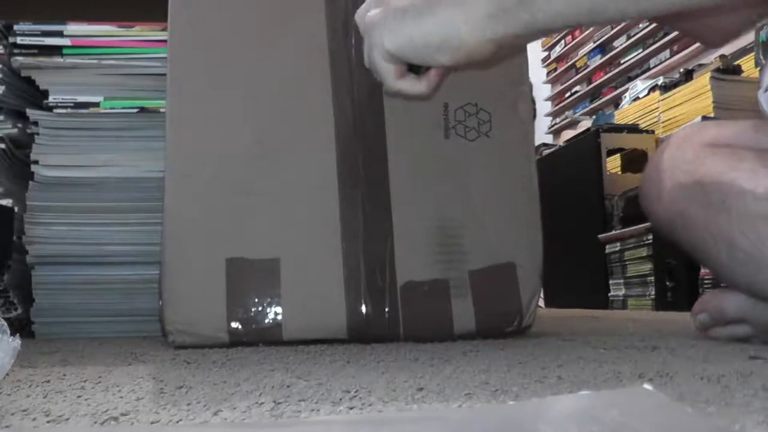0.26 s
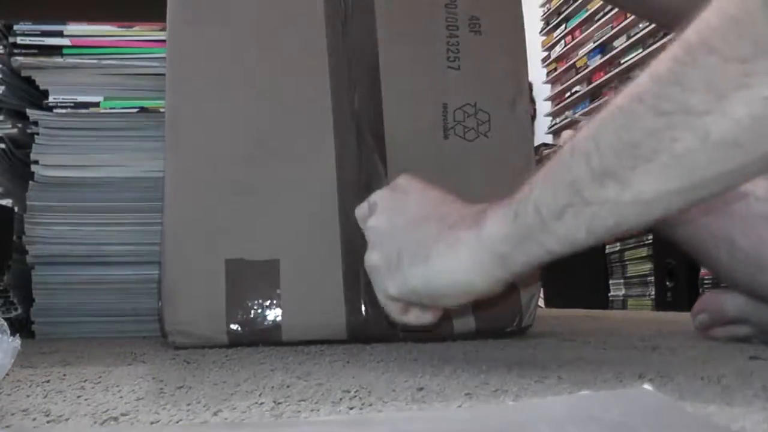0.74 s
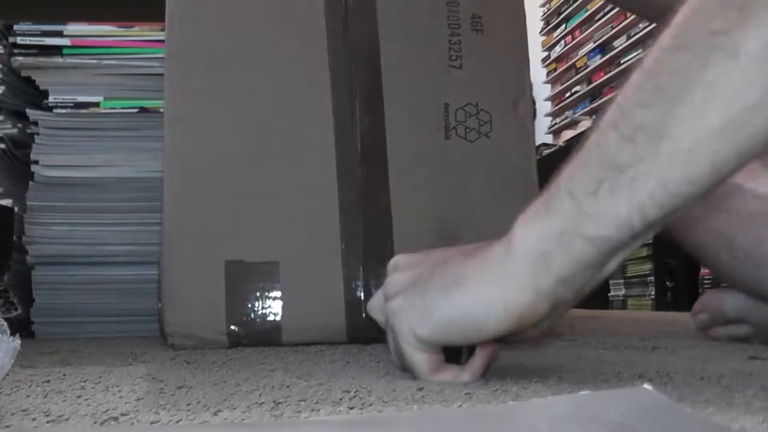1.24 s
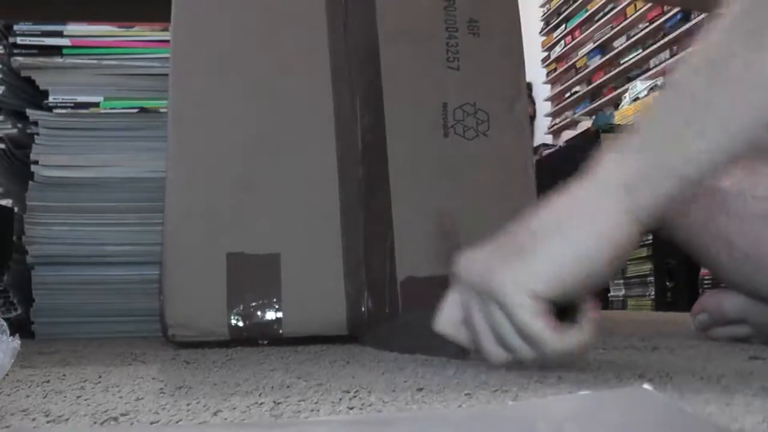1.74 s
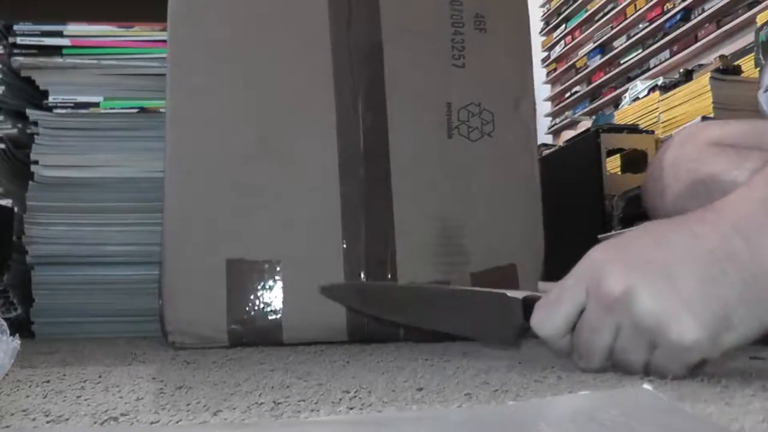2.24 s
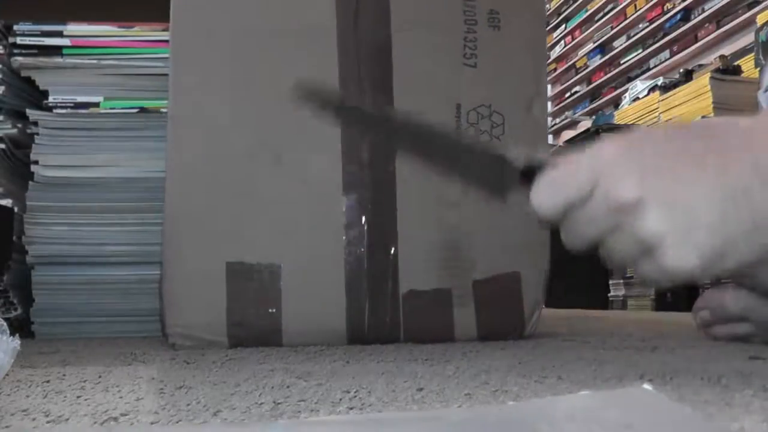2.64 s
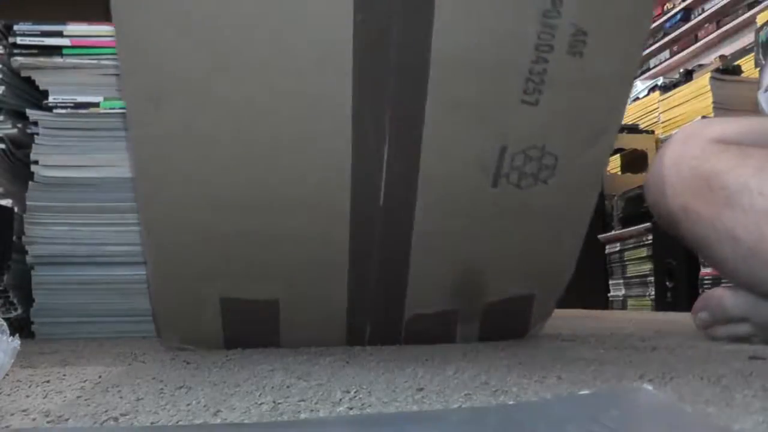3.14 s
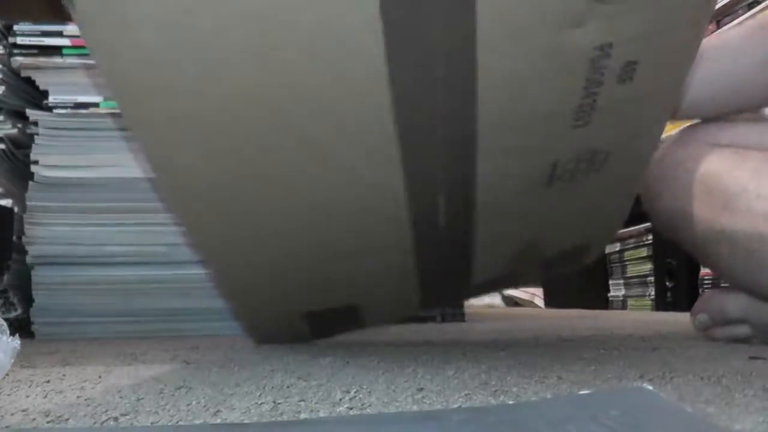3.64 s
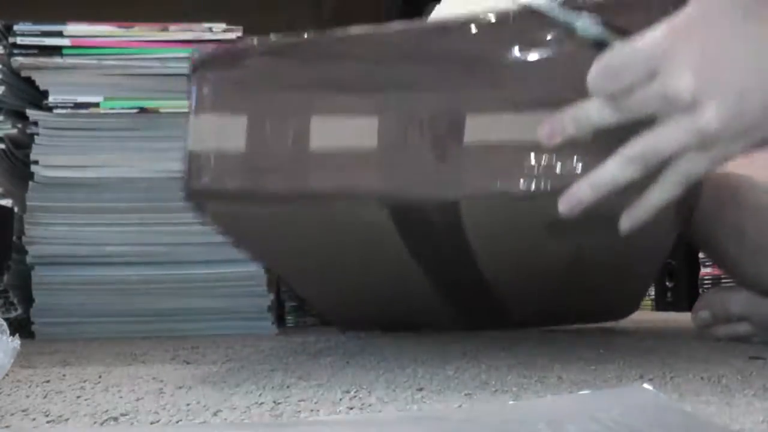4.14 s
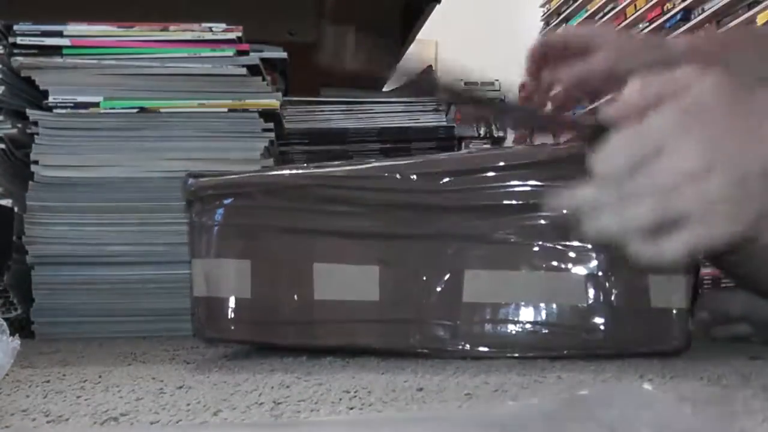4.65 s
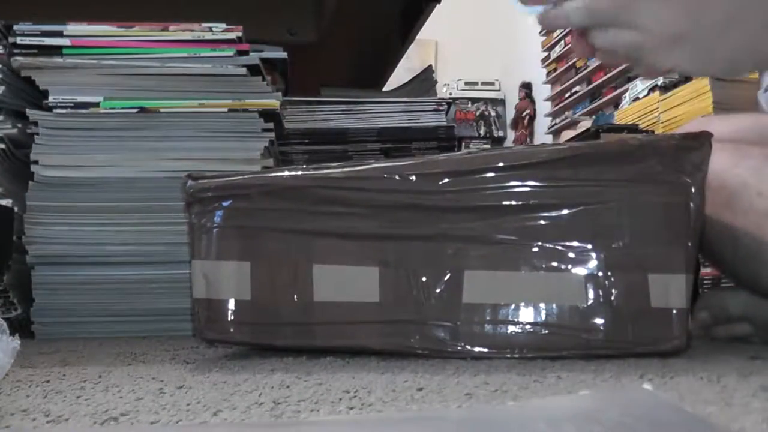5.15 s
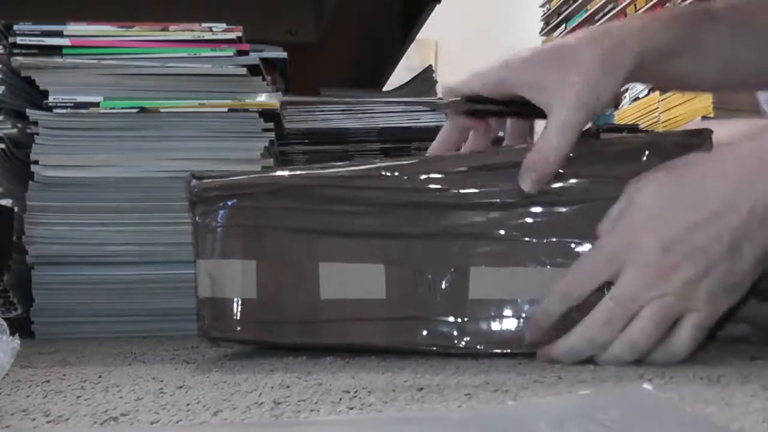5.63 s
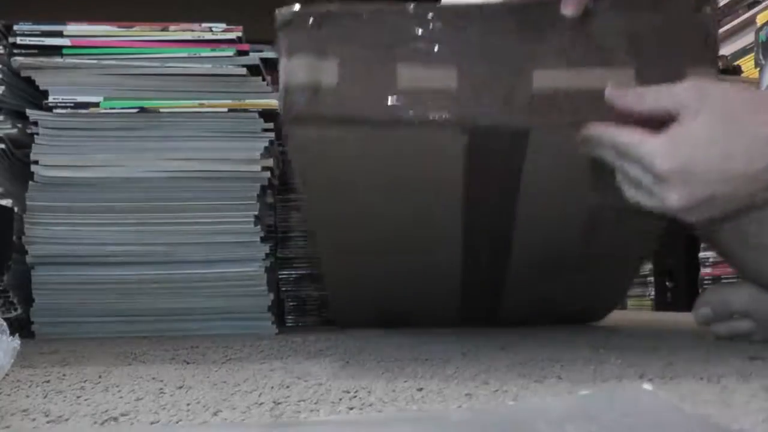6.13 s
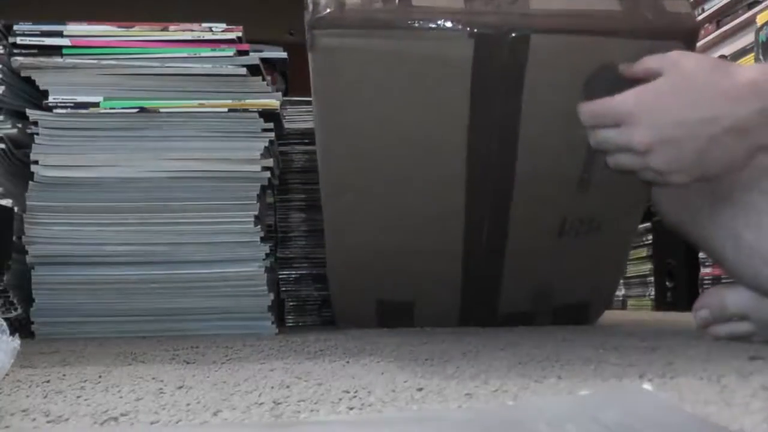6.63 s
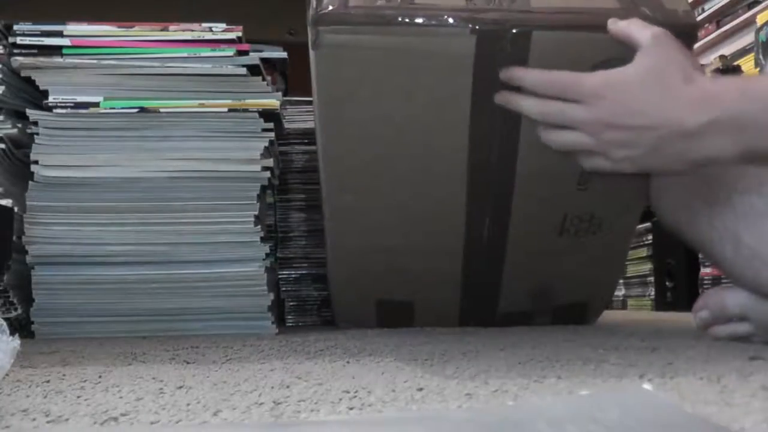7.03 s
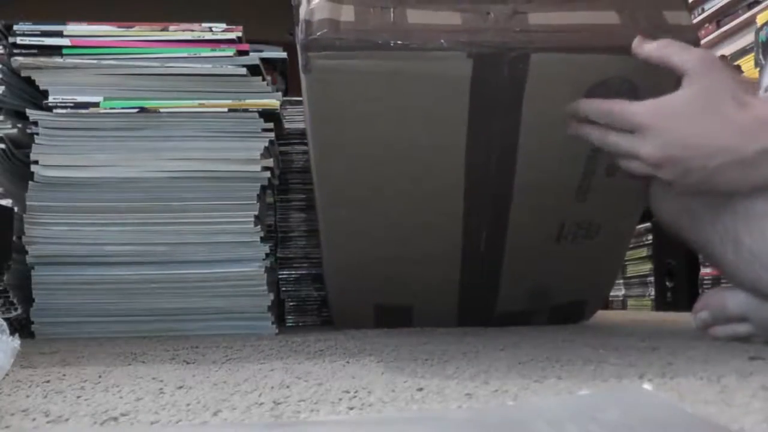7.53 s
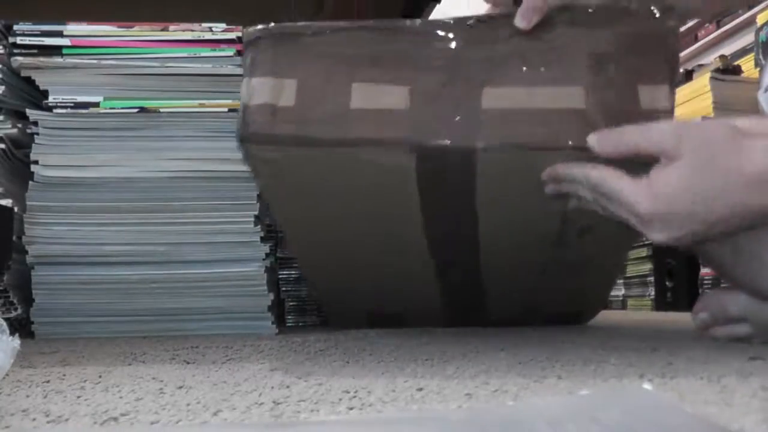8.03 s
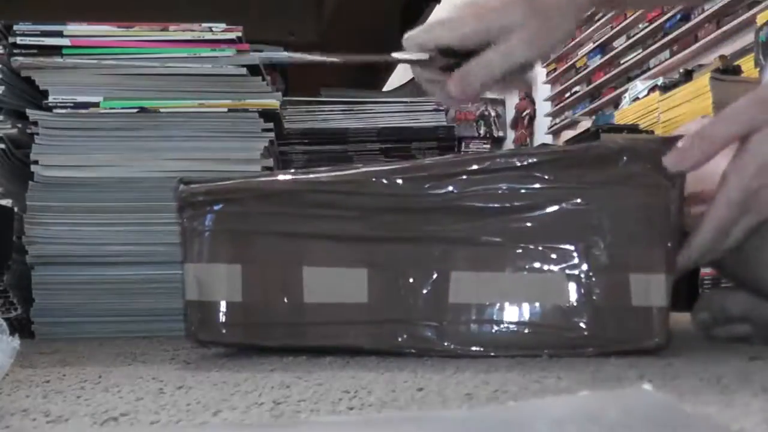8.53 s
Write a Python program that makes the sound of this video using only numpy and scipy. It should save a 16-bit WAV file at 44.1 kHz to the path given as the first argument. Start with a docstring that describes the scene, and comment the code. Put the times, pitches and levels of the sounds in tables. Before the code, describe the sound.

A dull knife rips down the tape of a big hollow cardboard box with booming thumps, then the box is slid and tipped, loose tape crackling.

```python
"""First a soft blade hiss over the low rush and drone of a small carpeted room, close to the microphone.
A dull kitchen knife is dragged down the packing tape of a big cardboard box: stick-slip noise hisses,
catches and tears, and the same slips make the hollow box boom. Struck panels swing as decaying sines.
Then the box is thumped, slid over the carpet with scraping friction noise and tipped back and forth,
while its loose tape crackles in short filtered clicks."""
import sys
import numpy as np
from scipy import signal
from scipy.fft import rfft, irfft
from scipy.io import wavfile
from scipy.ndimage import uniform_filter1d

SR = 44100
rng = np.random.default_rng(int(sys.argv[2]) if len(sys.argv) > 2 else 0)


def materialize(psi):
    """Save the field psi as 16-bit PCM at rate SR to the path in sys.argv[1].

    A 1-D psi becomes a single channel; in a 2-D psi each row is a channel.
    """
    bounded = np.clip(np.atleast_2d(psi).T, -1, 1)
    quanta = np.round(bounded * 32767).astype(np.int16)
    wavfile.write(sys.argv[1], SR, quanta)


N = 387198
TIME = np.arange(N) / SR


def amp(db):
    """Decibels to gain."""
    return 10 ** (np.asarray(db) / 20)


def evened(x):
    """Scaled to rms 1."""
    return x / np.sqrt(np.mean(x ** 2) + 1e-20)


def add(mix, s, sound):
    """Mixes a sound in at time s."""
    part = mix[max(round(s * SR), 0):][:len(sound)]
    part += sound[:len(part)]


def bins(size=8192):
    """The frequencies in Hz on which spectra are drawn."""
    return np.fft.rfftfreq(size, 1 / SR)


def read(points):
    """A spectrum in dB, joined on a log-frequency axis."""
    hz, db = np.transpose(points)
    return np.interp(np.log(bins() + 1), np.log(hz + 1), db)


def hump(distance, order):
    """A flat-topped band in dB, 3 dB down at distance 1."""
    return -10 * np.log10(1 + abs(distance) ** order)


def response(db):
    """The causal, minimum-phase impulse response that has this spectrum."""
    log_gain = np.log(amp(db))
    circle = np.concatenate([log_gain, log_gain[-2:0:-1]])
    return np.fft.ifft(np.exp(np.conj(signal.hilbert(circle)))).real[:len(db)]


def through(x, taps):
    """Filters x by an impulse response."""
    return signal.oaconvolve(x, taps)[:len(x)]


def flutter(depth_db, rate_hz):
    """A randomly wandering gain of mean power 1."""
    spectrum = rfft(rng.standard_normal(N)) / (1 + (np.fft.rfftfreq(N, 1 / SR) / rate_hz) ** 2)
    wander = np.clip(evened(irfft(spectrum, N)), -2, 2)
    return evened(amp(depth_db * wander))


def slips(per_s, spread_db, smooth):
    """Friction: many tiny slips of uneven size over a smooth rush, rms 1."""
    size = amp(spread_db * np.minimum(rng.exponential(1, N), 4)) * rng.choice([-1, 1], N)
    grains = evened(size * (rng.random(N) < per_s / SR))
    return evened(grains + smooth * rng.standard_normal(N))


def rubbed(drive, spectrum, patchy_db, size=512):
    """Colours friction noise; as the contact point moves, short-lived resonances come and go. Rms 1."""
    z = signal.stft(through(drive, response(read(spectrum))), nperseg=size)[2]
    across_pitch = uniform_filter1d(rng.standard_normal(z.shape), size=7, axis=0)
    patches = evened(uniform_filter1d(across_pitch, size=6, axis=1))
    return evened(signal.istft(z * amp(patchy_db * patches), nperseg=size)[1][:N])


def move(start, fastest, end, grab_s, let_go_s=0.029, slow_db=-6.5):
    """The gain of one rubbing move: it follows the speed of the hand, between a grab and a release."""
    speed = np.sin(np.pi / 2 * np.interp(TIME, [start, fastest, end], [0, 1, 0]))
    grab = np.minimum(TIME - start, 0) / grab_s
    release = np.maximum(TIME - end, 0) / let_go_s
    return np.exp(grab - release) * amp(slow_db * (1 - speed))


def together(gains):
    """Unrelated noises add in power."""
    return np.sqrt(sum(gain ** 2 for gain in gains))


def bursts(rows):
    """The gain of brief contacts that swell and fade: rows of peak t/s, level/dB, half length/s."""
    return sum(amp(db) * np.exp(-.5 * abs((TIME - at) / half) ** 3) for at, db, half in rows)


def box_ring(low_hz, stretch=1):
    """The panels' answer to one click, energy 1: a brief contact misses modes under low_hz; stretch
    raises the modes and that limit."""
    # panel modes of the hollow box: [f/Hz, width/Hz, relative level/dB]
    panel_modes = [(118, 53, 8), (189.8, 22, 11.5), (271, 100, 5), (450, 150, -7.5), (755, 255, -7.5),
                   (1122, 113, -12), (1240, 114, -14)]
    f = bins() / stretch + 1
    power = sum(amp(db) ** 2 / (1 + ((f * f - hz * hz) / (f * width)) ** 2) ** 2
                for hz, width, db in panel_modes)
    ring = response(10 * np.log10(power / (1 + (low_hz / f) ** 4) + 1e-10))
    return ring / np.linalg.norm(ring)


def air(shared_db=-41.5, apart=0.42, drone_hz=90, drone_width_hz=9):
    """The steady low rush of the room, partly alike in both channels, with a rough drone in the bass."""
    # colour of the room rush: [f/Hz, relative level/dB]
    rush_spectrum = [(50, -18), (110, -7.5), (380, -11.5), (1000, -28.5), (2000, -43), (7500, -61)]
    # the drone swelling and sinking: [t/s, level/dB]
    drone_levels = [(1.4, -46.5), (5.3, -40.5), (6.4, -54.5)]
    rush_taps = response(read(rush_spectrum))
    shared, left, right = (evened(through(rng.standard_normal(N), rush_taps)) for _ in range(3))
    rush = amp(shared_db) * (shared + apart * np.array([left, right]))
    line = 1 / (1 + (2 * (np.fft.rfftfreq(N, 1 / SR) - drone_hz) / drone_width_hz) ** 2)
    drone = evened(irfft(rfft(rng.standard_normal(N)) * line, N))
    return rush + drone * amp(np.interp(TIME, *np.transpose(drone_levels)))


def room(x, wet_db=-15, t60=0.19, early_t60=0.046, side_db=-9, side_treble_hz=10000):
    """A short, carpet-damped tail; the mid range comes back from the sides, with a little treble spread
    between channels."""
    t = np.arange(SR // 4) / SR
    # sparse random reflections, none before 2 ms
    taps = rng.choice([-1, 1], (3, len(t))) * (rng.random((3, len(t))) < 3000 / SR) * (t > .002)
    tails = taps[:2] * amp(-60 * t / t60)
    wet = np.array([through(x, tail / np.linalg.norm(tail)) for tail in tails])
    early = taps[2] * amp(-60 * t / early_t60)
    echo = through(x, early / np.linalg.norm(early))
    mid_band = signal.butter(2, [450, 1400], "band", fs=SR, output="sos")
    side_treble_band = signal.butter(2, side_treble_hz, "high", fs=SR, output="sos")
    side = amp(side_db) * (signal.sosfilt(mid_band, echo) + signal.sosfilt(side_treble_band, echo))
    return x + amp(wet_db) * wet + np.array([side, -side])  # opposite sign left and right


def sliding(scrape_gain_db=5.0, grab_s=0.0032):
    """Carpet fibres pluck the cardboard; lighter contact only brushes it."""
    # shoves over carpet and skin, scrape level before scrape_gain_db:
    # [start t/s, fastest t/s, let-go t/s (may precede the fastest), scrape level/dB, brush level/dB]
    shove_rows = [(1.655, 3.1, 3.4, -52.5, -63.5), (2.176, 2.236, 2.22, -44.5, -53),
                  (2.59, 2.6, 2.75, -52.5, -54), (3.421, 3.75, 4.11, -35, -45.5),
                  (3.937, 4.09, 4.35, -42.5, -52.5), (5.565, 6.106, 6.4, -47, -56),
                  (6.054, 6.306, 6.69, -51, -48), (7.548, 7.796, 8.15, -50, -50),
                  (7.89, 8.378, 8.6, -45.5, -51)]
    # the hands never rest entirely: [scrape level/dB before scrape_gain_db, brush level/dB]
    resting_levels = (-58.5, -69)
    # colour of the coarse scrape: [f/Hz, relative level/dB]
    scrape_spectrum = [(50, -6), (100, 10), (290, 10), (700, -0.5), (1700, -4.5), (2140, -11.5), (2800, -7),
                       (4500, -14.5), (8000, -16), (14000, -39.5)]
    # colour of the light brushing: [f/Hz, relative level/dB]
    brush_spectrum = [(2200, -24.5), (3600, 0.5), (4700, -7.5), (8700, 1), (12000, -14.5), (16000, -23)]
    shoves = [amp(levels)[:, None] * move(start, fastest, end, grab_s)
              for start, fastest, end, *levels in shove_rows]
    scrape, brush = together(shoves + [amp(resting_levels)[:, None]])
    plucks = slips(per_s=3000, spread_db=1.0, smooth=0.6) * flutter(depth_db=2.5, rate_hz=140)
    coarse = rubbed(plucks, scrape_spectrum, patchy_db=2.05)
    fine = rubbed(slips(per_s=1700, spread_db=4.0, smooth=0.8), brush_spectrum, patchy_db=3.5)
    return coarse * amp(scrape_gain_db) * scrape + fine * brush


def swishes(hz=11800, reach_hz=2750):
    """Smooth tape skims past: a thin, smooth band of noise high in the treble."""
    # skims of the tape: [peak t/s, level/dB, half length/s]
    skims = [(4.138, -52, 0.046), (6.33, -53.5, 0.093)]
    band = response(hump((bins() - hz) / reach_hz, order=8))
    return evened(through(rng.standard_normal(N), band)) * bursts(skims)


def squeaks(waver=0.038):
    """The knife blade squeaks as it scrapes the box: short stick-slip squeals, each on an unsteady pitch."""
    # squeals: [peak t/s, level/dB, half length/s, mean f/Hz]
    squeals = [(3.82, -36, 0.0062, 8190), (3.843, -35.5, 0.026, 2650), (3.866, -41, 0.0045, 4750)]
    unsteady = 1 + waver * evened(uniform_filter1d(rng.standard_normal(N), size=30))
    return sum(bursts([burst]) * np.sin(2 * np.pi * np.cumsum(hz * unsteady) / SR)
               for *burst, hz in squeals)


def snap(hz, octaves=0.78, rattle=0.15, rattle_s=0.0017, ring=0.22, ring_cycles=6):
    """A crease flips: a sharp click, a trailing rattle of the film and the facet's short ring, peak 1."""
    t = np.arange(SR // 40) / SR
    drive = rattle * rng.standard_normal(len(t)) / (1 + t / rattle_s) ** 2
    drive[0] = 1
    f = bins() + 1
    # a band around hz, with the top rolled off above 10.4 kHz
    hump_db = hump(np.log2(f / hz) / octaves, order=4) + hump(f / 10400, order=12)
    click = through(drive, response(hump_db)[:len(t)])
    facet = np.sin(2 * np.pi * hz * t) * np.exp(-t * hz / ring_cycles)
    click = click / abs(click).max() + ring * facet
    return click / abs(click).max()


def tape(knock_db=-11.5, knock_at_hz=2900, knock_db_per_octave=-5, crackle_knock_db=-7,
         crackles_per_s=170, crackle_hz=4200, spread_db=2.5, spread_octaves=2.53):
    """Loud snaps, and runs of small crackles where tape is flexed; both knock on the cardboard."""
    # creases of tape or cardboard snapping over: [t/s, peak level/dB, centre f/Hz]
    crease_snaps = [(0.6404, -6, 8500), (0.836, -12, 8800), (2.4377, -31, 3600), (2.5883, -15.5, 4040),
                    (2.6098, -17.5, 3340), (2.944, -26.5, 6500), (3.0724, -17.5, 3500), (3.0814, -21, 3040),
                    (3.2212, -23, 7000), (3.2638, -20, 3800), (3.747, -16, 2940), (4.4028, -18.5, 4240),
                    (4.529, -26.5, 3440), (4.5759, -20, 3770), (4.8109, -29, 3536), (5.2135, -30, 3970),
                    (5.4039, -26.5, 654), (5.5408, -21, 4020), (5.5805, -21.5, 5600), (5.5874, -24, 8550),
                    (5.6093, -23.5, 3380), (5.6234, -23, 2170), (5.6426, -24, 1780), (5.6747, -28, 6200),
                    (5.696, -27, 8700), (5.7712, -20.5, 4060), (5.8635, -26, 1020), (5.9529, -20.5, 8450),
                    (5.9838, -24.5, 2400), (6.801, -24.5, 3550), (6.9847, -23.5, 2090), (7.1368, -24, 4500),
                    (7.1477, -25.5, 3970), (7.4835, -13, 6340), (7.8279, -13, 2740), (8.1374, -5, 8630),
                    (8.3394, -13, 8950), (8.3655, -9, 9000), (8.377, -17, 4500), (8.4093, -12, 9000),
                    (8.4205, -10, 7220), (8.4244, -23, 2530), (8.4373, -18.5, 3650), (8.4662, -23, 4000),
                    (8.4884, -14.5, 9200), (8.4997, -14.5, 9300), (8.5278, -14.5, 7300),
                    (8.5691, -10, 9000), (8.6035, -23, 3610), (8.7481, -19, 6000), (8.7717, -12, 6500)]
    # the loose tape is flexed: [start t/s, end t/s, typical crackle peak level/dB]
    tape_flexes = [(2.261, 2.388, -39), (3.66, 3.9, -26), (5.573, 5.8, -35.5), (8.324, 8.485, -26),
                   (8.561, 8.608, -29)]
    film, knocks = np.zeros(N), np.zeros(N)
    for s, db, hz in crease_snaps:
        add(film, s, amp(db) * snap(hz))
        # big, low creases knock harder on the cardboard than small, bright ones
        octaves_up = np.log2(hz / knock_at_hz)
        add(knocks, s, amp([db + knock_db + knock_db_per_octave * octaves_up]))
    for start, end, db in tape_flexes:
        count = round((end - start) * crackles_per_s)
        for when, size, pitch in rng.random((count, 3)):
            s = start + when * (end - start)
            loud = amp(db + spread_db * np.log(size / (1 - size)).clip(-2, 2))
            add(film, s, loud * snap(crackle_hz * 2 ** (spread_octaves * (pitch - .5))))
            add(knocks, s, loud * amp([crackle_knock_db]))
    ring = box_ring(low_hz=980)
    return film + through(knocks, ring / abs(ring).max())


def thumps(rise_s=0.0012, cycles=7, scuff_db=-17, scuff_s=0.0085):
    """A struck panel swings a few times, while the scuffing contact sets the rest of the box ringing."""
    # blows and light taps, from the blade slipping free, a hand or the floor:
    # [t/s, peak level of the swing/dB, panel f/Hz]
    blows = [(0.595, -5.5, 188), (0.805, -11.5, 286), (0.8425, -11, 278), (.994, -3, 231),
             (1.193, -2.5, 330), (1.215, -2, 230), (1.225, -2, 232), (1.351, -15.5, 300), (1.391, -8, 263),
             (1.412, -4, 208), (1.421, -6, 98), (2.589, -23.5, 860), (3.072, -15, 172), (3.424, -17, 216),
             (3.4448, -1, 332), (3.459, -7, 165), (3.487, -16, 170), (3.728, -14, 280), (5.402, -17, 235),
             (5.543, -14.5, 247), (5.862, -21.5, 223), (5.9838, -10, 171), (6.033, -22.5, 187),
             (6.607, -23, 205), (7.828, -23, 1050)]
    swings, scuffs, t = np.zeros(N), np.zeros(N), np.arange(SR // 8) / SR
    for s, db, hz in blows:
        rise = (1 - np.exp(-t / rise_s)) ** 2
        decay = amp(-60 * t * hz / cycles)  # 60 dB down after that many cycles
        swing = np.sin(2 * np.pi * hz * t) * rise * decay
        add(swings, s, amp(db) * swing / abs(swing).max())
        # the scuff grows more slowly than the blow, so light knocks hold more of it
        scuff = rng.standard_normal(len(t)) * np.exp(-t / scuff_s)
        add(scuffs, s, amp(0.57 * db + scuff_db) * scuff)
    return swings + through(scuffs, box_ring(low_hz=240))


def knife(grab_s=0.03, boom_power=1.45, rip_boom_db=3, tip_hz=8750, tip_reach_hz=850, tip_db=-9,
          tear_hz=2000, tear_octaves=0.95, tear_db=-3, tear_run_db=-9, stiffer=1.128):
    """The edge sticks and slips through the tape; the same slips drive the box."""
    # pulls along the tape: [start t/s, fastest t/s, let-go t/s (may precede the others),
    # hiss level/dB, boom level over the hiss/dB]
    pulls = [(0.067, 0.118, 0.18, -40, 8.5), (0.519, 0.653, 0.68, -31, 11.5),
             (0.786, 0.896, 0.88, -29, 15.5), (0.856, 0.88, 1.073, -38, 13.5),
             (1.151, 1.204, 1.363, -41.5, 17), (1.384, 1.405, 1.338, -23.5, 18)]
    # the blade or a hand catches and rasps a short way: [peak t/s, hiss level/dB, half length/s]
    catches = [(0.635, -29.5, 0.012), (0.945, -29.5, 0.0049), (0.994, -24, 0.0045), (1.189, -23.5, 0.0075),
               (1.22, -25, 0.0084), (1.279, -30.5, 0.0036), (1.351, -32, 0.0035), (1.403, -20, 0.011),
               (2.609, -38.5, 0.016), (3.188, -41, 0.014), (3.539, -36.5, 0.018), (3.711, -34, 0.011),
               (3.821, -35, 0.0079), (4.477, -45, 0.018), (4.607, -47, 0.025), (7.388, -44, 0.012)]
    # at the strongest catches the upper panel modes of the box rattle too:
    # [peak t/s, level/dB, half length/s]
    catch_rattles = [(0.614, -24, 0.0048), (0.636, -20, 0.011), (0.994, -26, 0.0038), (1.352, -25, .004),
                     (1.402, -24, 0.007)]
    # colour of the blade on tape: [f/Hz, relative level/dB]
    blade_spectrum = [(450, -13.5), (1150, 15.5), (2120, -6), (3100, 3), (4900, -5), (8500, 5), (10200, -4),
                      (16000, -34)]
    run = together(amp(db) * move(*times, grab_s) for *times, db, boom_db in pulls)
    # the panel booms only as the hand bears down, so its boom swells more steeply than the hiss
    lean = together(amp(db + boom_db) * move(*times, grab_s) ** boom_power
                    for *times, db, boom_db in pulls)
    rips = bursts(catches)
    grip = flutter(depth_db=2.0, rate_hz=40)
    edge_slips = grip * slips(per_s=900, spread_db=3.0, smooth=0.71)
    tip_slips = grip * slips(per_s=900, spread_db=3.0, smooth=0.71)
    # snagged near the bottom edge, a thin, high rasp of the tip joins the broad hiss
    snagged = np.interp(TIME, [.92, 1.03, 1.35, 1.43], [0, 1, 1, 0])
    tip_band = response(hump((bins() - tip_hz) / tip_reach_hz, order=4))
    tip = evened(through(tip_slips, tip_band))
    hiss = rubbed(edge_slips, blade_spectrum, patchy_db=2.0) + amp(tip_db) * snagged * tip
    # the film tears with a fuller, lower rasp, most of all where the edge catches
    tear_band = response(hump(np.log2((bins() + 1) / tear_hz) / tear_octaves, order=8))
    tear = evened(through(tip_slips, tear_band))
    tear_gain = np.hypot(amp(tear_db) * rips, amp(tear_run_db) * run)
    # the panel is stiffer near its edge and booms higher there
    push = edge_slips * np.hypot(lean, rips * amp(rip_boom_db))
    boom = sum(through(push * np.sqrt(share), box_ring(low_hz=61.6, stretch=stretch))
               for share, stretch in ((1 - snagged, 1), (snagged, stiffer)))
    # the rattle leaves out the wandering grip
    rattle = through(tip_slips / grip * bursts(catch_rattles), box_ring(low_hz=890))
    return hiss * np.hypot(run, rips) + tear * tear_gain + boom + rattle


def scene():
    """Knife, blows, tape and sliding sound in the room, over its steady rush."""
    return room(knife() + thumps() + tape() + sliding() + swishes() + squeaks()) + air()


def record(dry, low_cut_hz=44, edge_hz=16200, ceiling=.9):
    """Each microphone port has its colour; deep bass is cut, high peaks are rounded, then the band ends."""
    # the two microphone ports: [f/Hz, left minus right level/dB]
    port_difference = [(360, -2), (600, 5.5), (1300, 3), (2300, -1.5)]
    ports = np.array([through(x, response(sign * read(port_difference) / 2))
                      for x, sign in zip(dry, (1, -1))])
    ports = signal.sosfilt(signal.butter(3, low_cut_hz, "high", fs=SR, output="sos"), ports)
    ports = ports / (1 + (ports / ceiling) ** 4) ** .25
    band_limit = signal.firwin(255, edge_hz, window=("kaiser", 9), fs=SR)
    return signal.oaconvolve(ports, band_limit[None], "same")


dry = scene()
out = record(dry)
materialize(out)
```